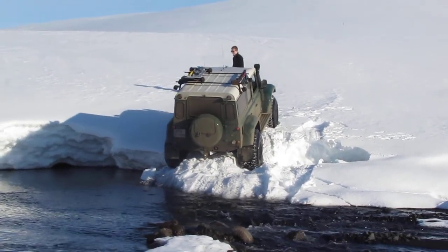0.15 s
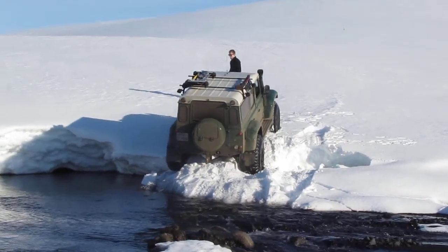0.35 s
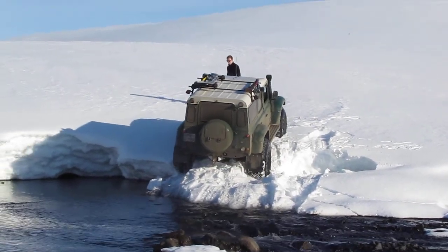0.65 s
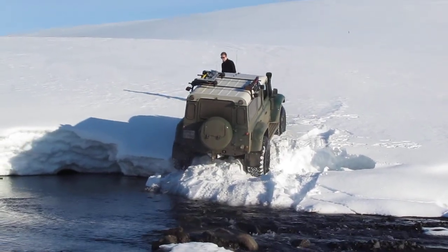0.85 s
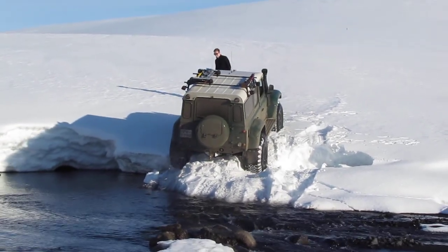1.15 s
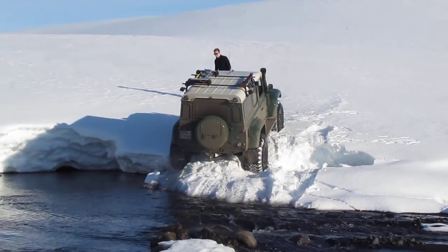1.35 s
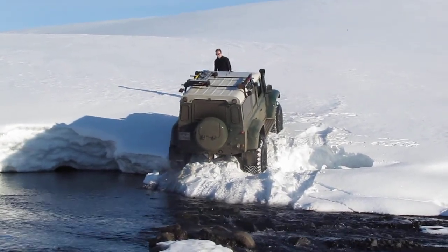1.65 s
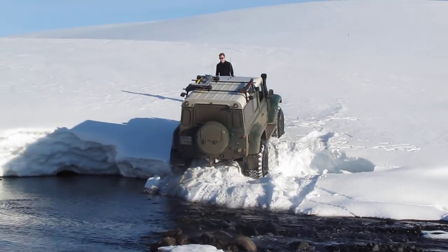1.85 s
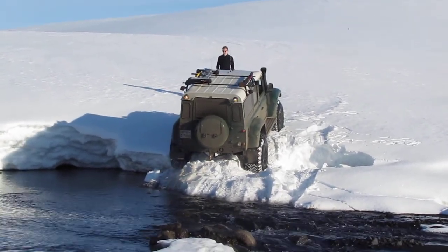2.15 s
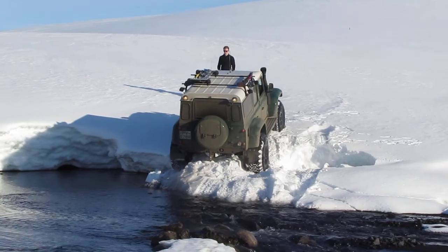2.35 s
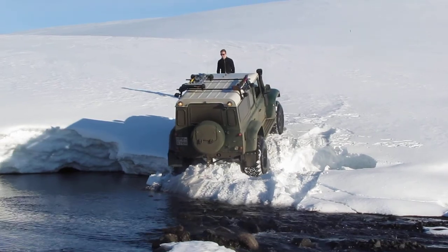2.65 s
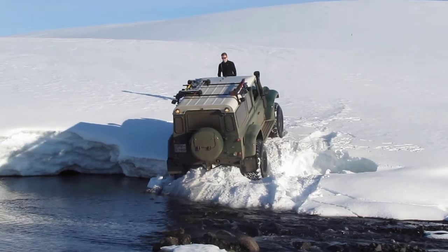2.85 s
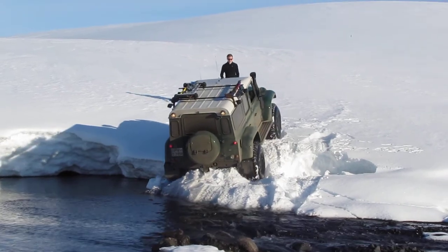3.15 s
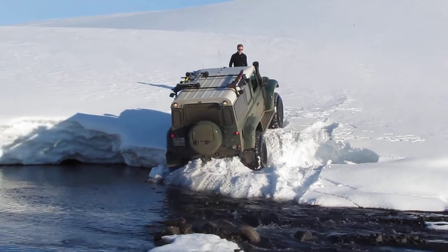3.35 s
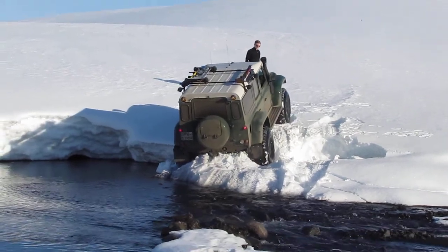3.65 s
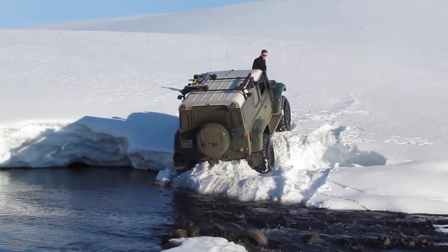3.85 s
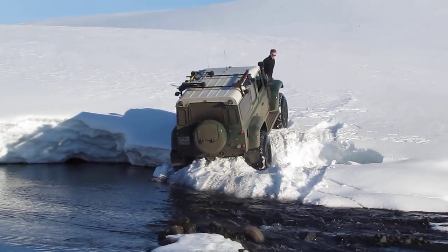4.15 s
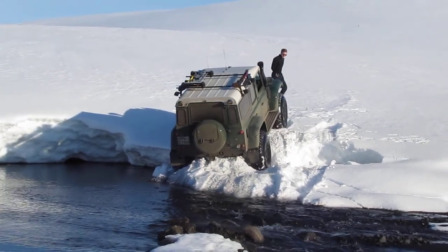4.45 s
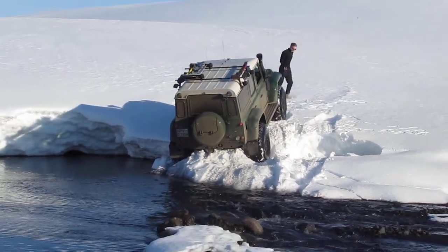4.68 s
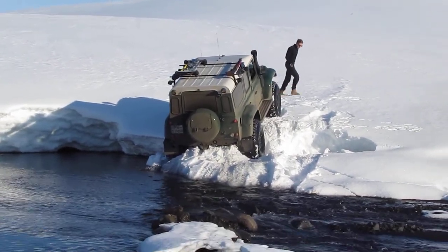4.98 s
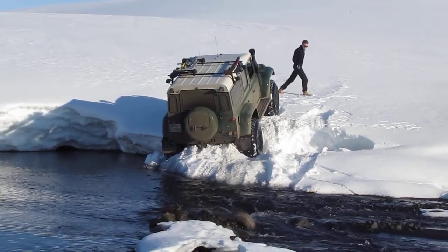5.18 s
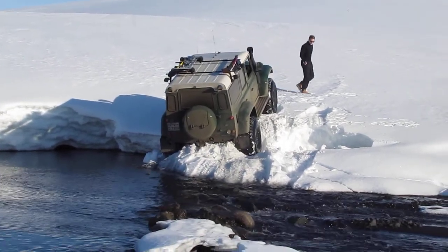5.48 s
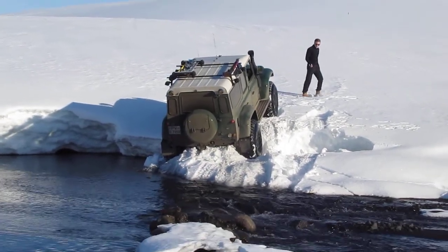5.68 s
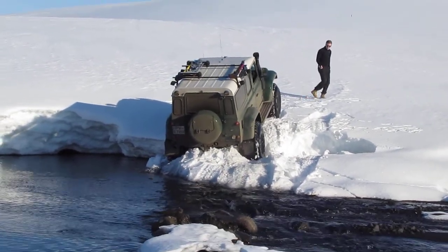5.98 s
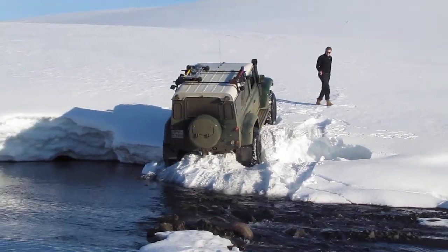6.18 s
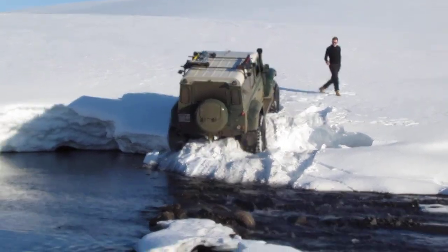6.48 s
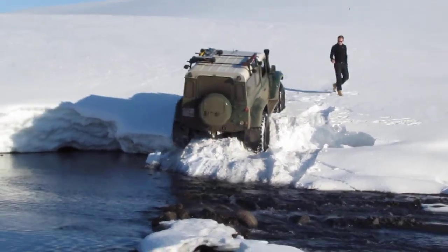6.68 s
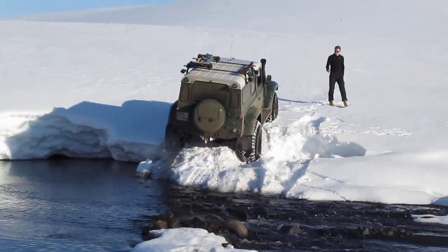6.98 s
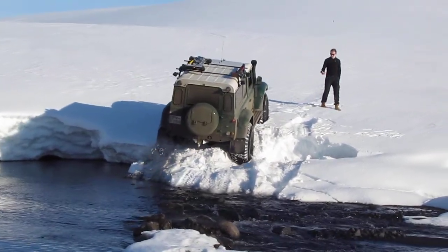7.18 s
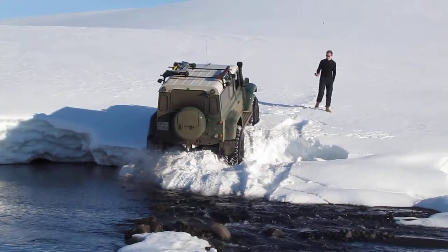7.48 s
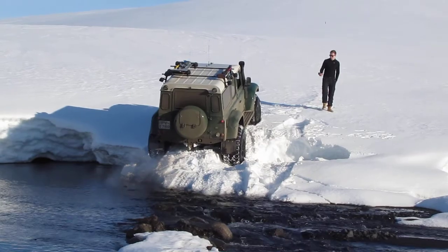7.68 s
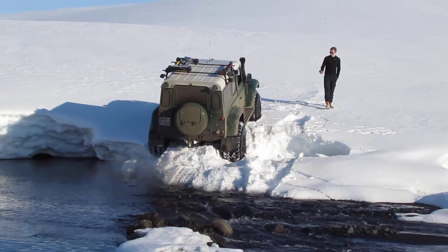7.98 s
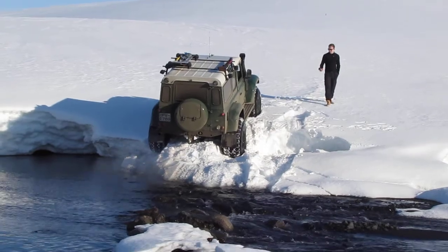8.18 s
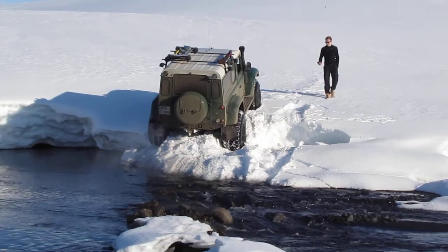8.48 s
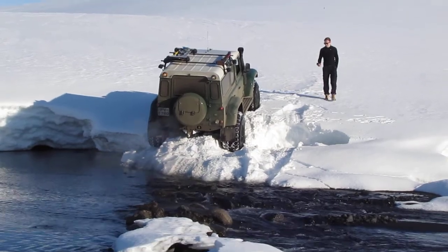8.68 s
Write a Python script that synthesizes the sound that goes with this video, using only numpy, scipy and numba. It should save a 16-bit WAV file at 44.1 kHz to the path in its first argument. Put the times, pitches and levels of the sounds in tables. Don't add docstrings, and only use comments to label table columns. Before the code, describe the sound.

From 0 to about 9 seconds, a large eight-cylinder engine idles close to the camera microphone: a deep throb around 50 hertz, with roughly seven hollow chuffs a second, small knocks and a loping loud-soft pattern that deepens and evens out. A shallow river runs steadily over stones, a wide, flickering rush with fine bubbling. Across the water, a stuck off-road vehicle lugs at the start, then its low growl climbs until about 2 seconds and falls away by 2.5. Slush swells softly near 1.6 and is thrown suddenly at 3.6. Idle and water carry the middle. From 5.5 the second rev emerges, climbing faster and strongest at 6.7, fading by 7.6; slush spatters at 6.1 and most loudly at 7.3. Single water plops dot the whole, clear around 3.1 to 3.6 and at 8. Idle and river continue to the end, in open, dry air.

```python
import sys
import numpy as np
from scipy import signal
from scipy.fft import rfft, irfft
from scipy.io import wavfile
from scipy.ndimage import uniform_filter1d
from numba import njit

SR = 44100
rng = np.random.default_rng(int(sys.argv[2]) if len(sys.argv) > 2 else 0)


def rack_gain(trim_db):
    fader = np.asarray(trim_db, float)
    return 10 ** (fader / 20)


def inscribe(sig):
    pcm = np.round(np.clip(np.atleast_2d(sig).T, -1, 1) * 32767)
    wavfile.write(sys.argv[1], SR, pcm.astype(np.int16))


N = 389388
T = np.arange(N) / SR
HZ = np.maximum(np.arange(N // 2 + 1) * SR / N, 1)

# (frequency [Hz], width [Hz], level [dB])
BODY_MODES = [(28, 18, -52), (43, 16, -38.5), (90, 32, -33.8), (127, 22, -41), (150, 12, -50),
              (180, 35, -45), (208, 40, -44)]


def level(x, db):
    return x * rack_gain(db) / np.sqrt(np.mean(x ** 2))


def on_log_hz(table, column=1):
    table = np.array(table)
    return np.interp(np.log(HZ), np.log(table[:, 0]), table[:, column])


def ring(x, hz, width_hz):
    detuning = (HZ / hz - hz / HZ) * hz / width_hz
    return irfft(rfft(x) / (1 + 1j * detuning) ** 2, N)


def resonant_noise(modes):
    return sum(level(ring(rng.standard_normal(N), hz, width_hz), db) for hz, width_hz, db in modes)


def walk(rate_per_s):
    hold = int(SR / rate_per_s)
    steps = np.repeat(rng.standard_normal(N // hold + 1), hold)
    slewed = uniform_filter1d(uniform_filter1d(steps, hold), hold)[:N]
    return 1.4 * (slewed - uniform_filter1d(slewed, 8 * hold))


@njit
def bubbles(start, hz, cycles, size, glide):
    out = np.zeros(N)
    for k in range(len(start)):
        first = int(start[k])
        step = 2 * np.pi * hz[k] / SR
        length = int(cycles * SR / hz[k])
        phase = 0.
        for i in range(min(2 * length, N - first)):
            out[first + i] += size[k] * np.exp(-2.5 * i / length) * np.sin(phase)
            phase += step * (1 + glide * i / length)
    return out


def exhaust_tones(crank):
    # (multiple of the cycle rate, level [dB])
    harmonics = [(4, -55), (5, -45), (8, -28.5), (11, -32.3), (12, -41.5), (13, -43), (16, -39), (19, -42),
                 (21, -40), (23, -50), (24, -35.3), (25, -48), (26, -47.5), (32, -47), (38, -50)]
    bank_lag_cycles = .306
    out = 0
    for order, db in harmonics:
        lag_cycles = 0 if order in (8, 16) else order * bank_lag_cycles
        phase = 2 * np.pi * order * crank + np.pi - 2 * np.pi * lag_cycles
        out = out + np.sqrt(2) * rack_gain(db + walk(3)) * np.cos(phase)
    return out


def cycle_chuff_db(at, mean_crank):
    # (from [s], cycles from loud to loud, loud level [dB], soft level [dB])
    lope_pattern = [
        (0, 2, -24.5, -25),
        (.286, 3, -23.5, -27.5),
        (.886, 2, -23, -32),
        (2.085, 3, -23, -29),
        (3.272, 3, -23, -32),
        (4.469, 3, -22.5, -30),
        (5.211, 2, -23, -34),
        (5.803, 2, -24.5, -27),
        (6.554, 1, -24.5, -24.5),
        (6.998, 2, -23, -32),
    ]
    since_s, every, loud_db, soft_db = np.transpose(lope_pattern)
    first = np.rint(np.interp(since_s, T, mean_crank))
    cycle = np.arange(len(at)) + 1
    row = np.searchsorted(first, cycle, side="right") - 1
    loud = (cycle - first[row]) % np.maximum(np.rint(every[row]), 1) == 0
    scatter_db = .8 * rng.standard_normal(len(at)) * (2 - loud)
    return np.where(loud, loud_db[row], soft_db[row]) + scatter_db


def chuffs(at, chuff_db):
    pitch_hz, build_s, vent_s, span_s, peak_s = 105, .05, .009, .062, .018
    blows = np.zeros(N)
    blows[np.minimum(at + int(peak_s * SR), N - 1)] = rack_gain(1.22 * chuff_db)
    u = np.arange(-SR // 8, SR // 8 + 1) / SR
    envelope = np.exp(np.minimum(u / build_s, -u / vent_s))
    onset = 1 - np.clip(-u / span_s, 0, 1) ** 2
    chuff = -np.cos(2 * np.pi * pitch_hz * u) * envelope * onset
    return level(signal.fftconvolve(blows, chuff, "same"), -30.3)


def raps(at, chuff_db):
    lead_s = .053
    hits = np.zeros(N)
    hits[at - int(lead_s * SR)] = rack_gain(.8 * chuff_db) * rng.choice([-1, 1], len(at))
    return level(ring(hits, 248, 36), -43)


def firing_knocks(crank):
    # (frequency [Hz], width [Hz], level [dB])
    pipe_modes = [(110, 25, -38), (243, 38, -43), (305.3, 25, -52), (360.7, 18, -54.5)]
    fired = np.flatnonzero(np.diff(np.floor(8 * crank)))
    uneven = np.tanh(1.4 * rng.standard_normal(len(fired)))
    knocks = np.zeros(N)
    knocks[fired] = uneven * rack_gain(3.4 * np.cos(2 * np.pi * (crank[fired] - .64)))
    knocks = knocks * rack_gain(2 * walk(9))
    return sum(level(ring(knocks, hz, width_hz), db) for hz, width_hz, db in pipe_modes)


def idle():
    # (time [s], engine speed [cycles/s])
    idle_speed = [
        (0, 6.7077),
        (1.5, 6.6232),
        (2.2, 6.8177),
        (3.4, 6.6417),
        (5.2, 6.7764),
        (6.4, 6.6432),
        (7.1, 6.8113),
        (7.8, 6.615),
        (8.83, 6.6847),
    ]
    crank_start_cycles = .0776
    mean_crank = crank_start_cycles + np.cumsum(np.interp(T, *np.transpose(idle_speed))) / SR
    at = np.flatnonzero(np.diff(np.floor(mean_crank)))
    chuff_db = cycle_chuff_db(at, mean_crank)
    crank = mean_crank + 0.0022 * walk(9)
    out = exhaust_tones(crank) + chuffs(at, chuff_db) + raps(at, chuff_db)
    return out + firing_knocks(crank) + resonant_noise(BODY_MODES)


def far_engine():
    # (time [s], firing rate [Hz], level [dB])
    throttle_revs = [
        [(0, 36.5, -30), (.25, 41.77, -46), (.45, 52, -28), (1.05, 71.4, -26), (1.2, 73.4, -44),
         (1.5, 81.1, -43), (1.9, 85.25, -25.5), (2.5, 85, -57)],
        [(5.5, 39.4, -56), (5.95, 45.7, -55), (6.2, 53.3, -43), (6.35, 59.9, -28.5), (6.7, 78.5, -23),
         (6.85, 82.3, -28.5), (7, 88.3, -40), (7.3, 95.7, -39), (7.6, 87.7, -57)],
    ]
    out = 0
    for rev, start_turns in zip(throttle_revs, (.45, .1)):
        s, hz, db = np.transpose(rev)
        rate_hz = np.interp(T, s, hz) * (1 + 0.0032 * walk(12))
        phase = 2 * np.pi * (start_turns + np.cumsum(rate_hz) / SR)
        octave = rack_gain(np.interp(T, [.25, .45], [5, -14]))
        tone = np.sin(phase) + octave * np.sin(2 * phase) + np.sin(phase / 2) / 6
        loudness_db = np.interp(T, s, db, right=-120, left=-120) + 2.9 * walk(34)
        out = out + np.sqrt(2) * rack_gain(loudness_db) * tone
    return out


def slush():
    # (peak time [s], level [dB], swell [dB/s], fade [dB/s])
    spray_bursts = [
        (.1, -46, 50, 45),
        (1.6, -40, 2, 28),
        (3.6, -35, 101, 49),
        (6.1, -39.5, 36, 38),
        (7.33, -30.5, 26.5, 25),
    ]
    # (frequency [Hz], width [Hz], level [dB])
    slush_modes = [(268, 200, -2.5), (355, 83, -3), (675, 510, 0.5), (1400, 1160, 0.5), (2640, 2400, -1.5),
                   (5470, 2500, -9)]
    bursts = 0
    for s, db, swell, fade in spray_bursts:
        bursts = bursts + rack_gain(db - np.maximum(swell * (s - T), fade * (T - s)))
    return level(resonant_noise(slush_modes) * rack_gain(0.82 * walk(14)), 0) * bursts


def drops():
    # (time [s], peak level [dB], pitch [Hz])
    plops = [(0.4166, -29, 2270), (.4574, -28, 2400), (1.1079, -28, 1890), (1.6618, -23, 5600),
             (1.838, -29, 7500), (1.842, -30, 3572), (2.3246, -33, 3300), (3.13, -24, 1400),
             (3.3779, -24, 2200), (3.6092, -21, 2490), (4.051, -30, 7000), (4.368, -26, 4500),
             (5.8248, -35, 2500), (7.975, -20.5, 2290), (8.2107, -28, 2260), (8.4731, -35, 2080)]
    s, db, hz = np.transpose(plops)
    return bubbles(s * SR, hz, 11.4, rack_gain(db), 0.26)


def rush():
    noise, shared, quick = rfft(rng.standard_normal(N)), walk(7.6), walk(25)
    place = np.log2(np.clip(HZ, 250, 16000) / 250) * 1.5
    out = 0
    for band in range(10):
        share = np.clip(1 - abs(place - band), 0, 1)
        slow_db = (-0.18 + 0.059 * band) * (walk(13) + 0.7 * shared)
        flicker_db = slow_db + .5 * walk(40) + 0.05 * band * quick
        out = out + irfft(noise * share, N) * rack_gain(flicker_db)
    return out


def fizz():
    when, pitch, loud = rng.random((14000, 3)).T
    hz = 450 * 2 ** (4.5 * pitch)
    size = hz * rack_gain(np.minimum(-3.6 * np.log(1 - loud), 17))
    return bubbles(when * N, hz, 7.3, size, 0.27)


def river():
    # (time [s], level [dB])
    flow = [
        (0, -32.5),
        (8.83, -32),
    ]
    # (frequency [Hz], density [dB/Hz])
    river_spectrum = [(180, -27), (300, -1.5), (331, -5.5), (366, -8.5), (424, -9), (509, -6.5),
                      (674, -4.5), (822, -5.5), (908, -9), (1280, -6.5), (2840, -12), (4980, -19),
                      (6930, -23.5), (10300, -32.5), (15600, -42)]
    water = level(rush(), 0) + level(fizz(), -9.5)
    colour = rack_gain(on_log_hz(river_spectrum)) * (HZ > 120)
    return level(irfft(rfft(water) * colour, N), 0) * rack_gain(np.interp(T, *np.transpose(flow)))


def scene():
    # (frequency [Hz], likeness [0-1], left minus right [dB])
    mic_ports = [(60, 1, .3), (300, .98, .8), (650, .93, .8), (1100, .7, 0), (1500, .83, -.5),
                 (2400, .45, -2.5), (3500, .64, 2.5), (5000, .1, 1.8), (7000, .55, -.5), (9300, .74, 1.5),
                 (11600, .27, 1.5), (13000, .1, -1.8), (15500, .35, 0)]
    engines = rfft(idle() + far_engine() + drops())
    near, other = (rfft(river() + slush()) for _ in range(2))
    like = np.clip(on_log_hz(mic_ports), 0, 1)
    mid = engines + near * np.sqrt((1 + like) / 2)
    side = other * np.sqrt((1 - like) / 2) + rfft(resonant_noise(BODY_MODES[1:])) / 4
    pan = rack_gain(on_log_hz(mic_ports, column=2) / 2)
    lag = np.exp(-2j * np.pi * HZ * 1.2 / SR / (1 + (HZ / 6500) ** 6))
    left = irfft((mid + side) * pan * lag, N)
    right = irfft((mid - side) / pan, N)
    return np.array([left, right])


def roll_off(x):
    return signal.sosfilt(signal.butter(12, 15720, fs=SR, output="sos"), x)


def record(dry):
    bass_cut = signal.butter(2, 22, "high", fs=SR, output="sos")
    mix = signal.sosfilt(bass_cut, dry)
    return roll_off(mix)


dry = scene()
out = record(dry)
inscribe(out)
```